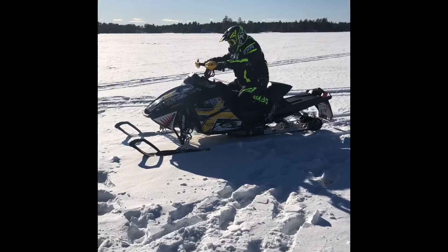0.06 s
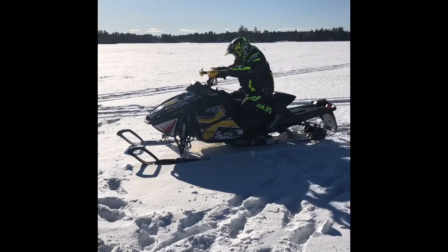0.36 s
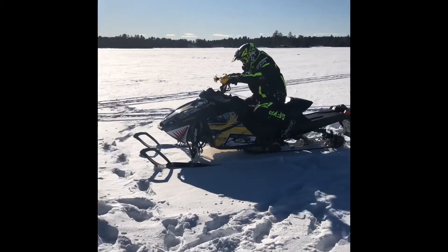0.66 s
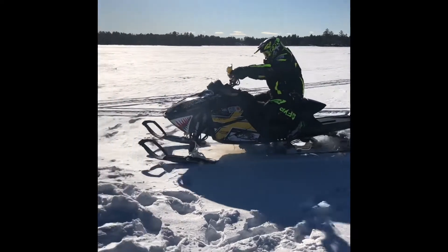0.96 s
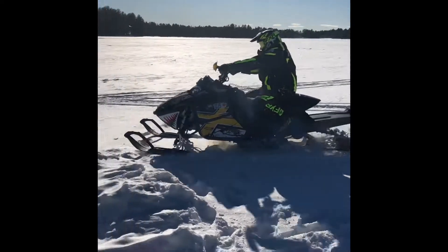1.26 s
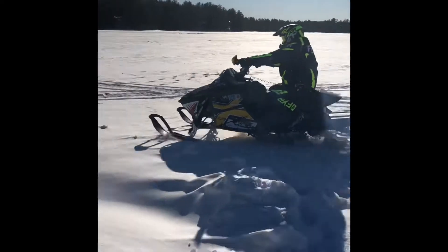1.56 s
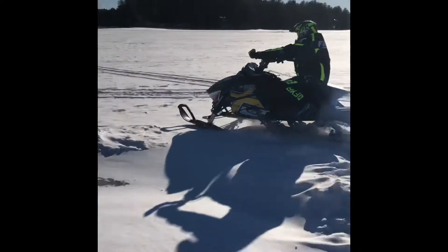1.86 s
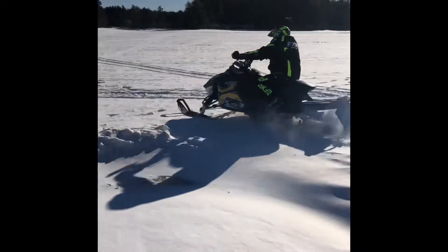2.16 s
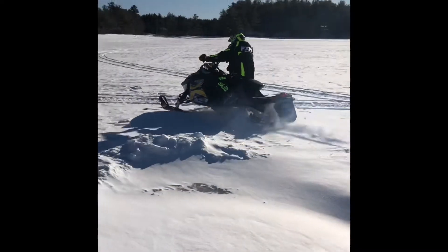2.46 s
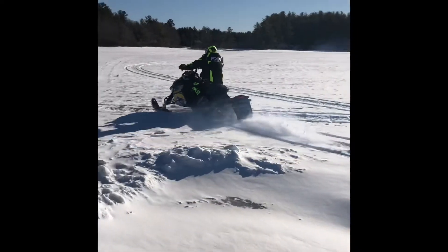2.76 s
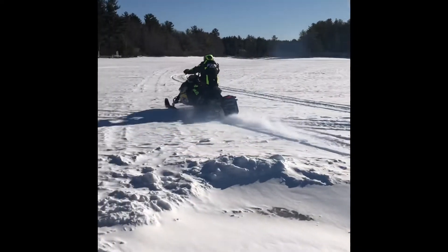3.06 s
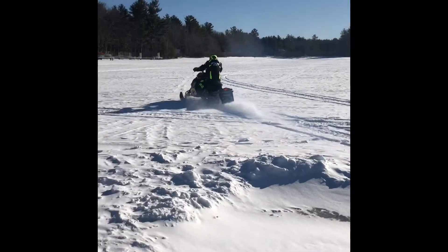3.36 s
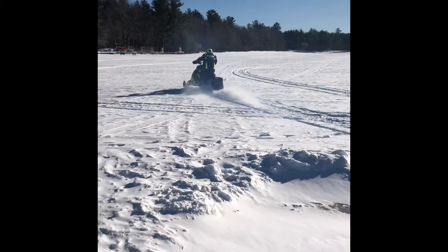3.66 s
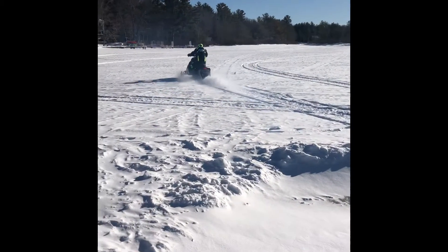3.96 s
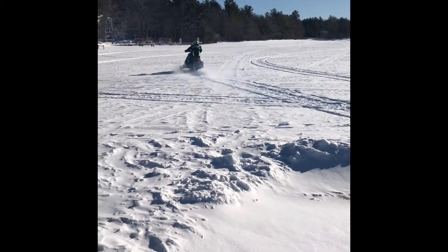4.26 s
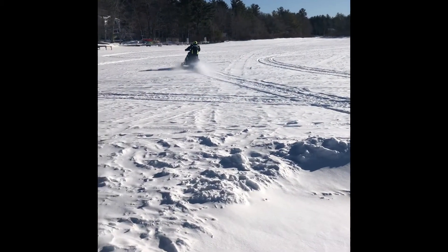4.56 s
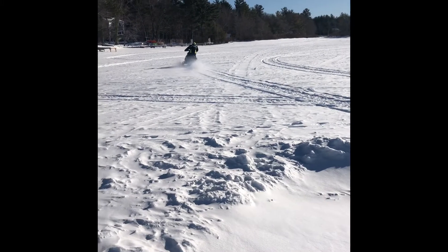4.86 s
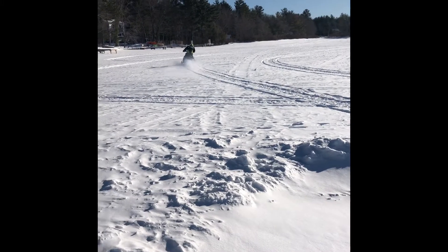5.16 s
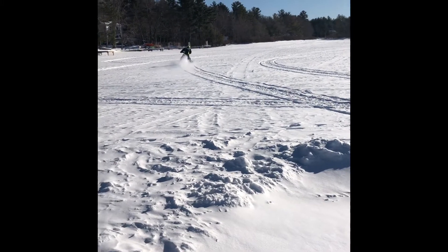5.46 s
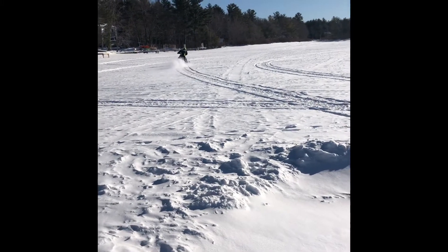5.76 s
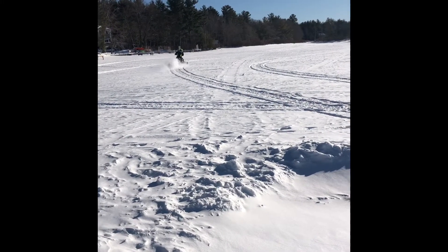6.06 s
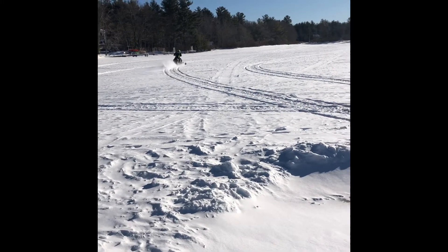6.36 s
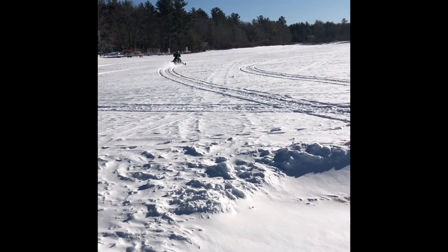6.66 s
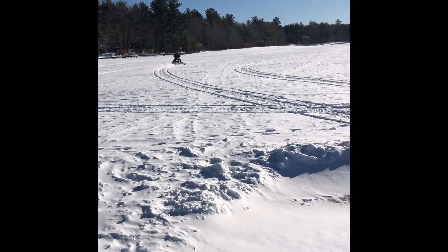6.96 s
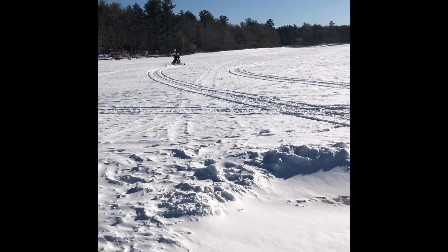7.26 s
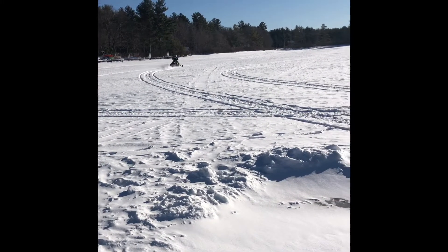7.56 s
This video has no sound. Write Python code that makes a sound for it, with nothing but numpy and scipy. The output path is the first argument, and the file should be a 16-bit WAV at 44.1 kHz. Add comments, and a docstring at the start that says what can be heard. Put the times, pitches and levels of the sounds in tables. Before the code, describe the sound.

A two-stroke snowmobile gives two quick, rattling throttle blips close to the microphone, then pulls away with a raspy drone. Its track rumbles, crunches through the crust and throws hissing snow. The engine climbs in pitch while fading across open snow, drops as it coasts, then rises again faintly far off. Low wind gusts buffet the microphone throughout.

```python
"""A two-stroke twin snowmobile blips its throttle, pulls away over snow, coasts and opens up far off.
Each firing pulses the exhaust pipe, giving a harmonic series on the firing rate, while the pistons
force the engine case into resonance. The drive hisses; the track rumbles, drums, breaks the crust and
throws snow. The sled fades and dulls with distance, and the low end throbs late in the ride.
Low gusts rumble on the microphone."""
import sys
import numpy as np
from scipy import signal
from scipy.fft import rfft, irfft, next_fast_len
from scipy.io import wavfile
from scipy.ndimage import uniform_filter1d, map_coordinates

SR = 44100
rng = np.random.default_rng(int(sys.argv[2]) if len(sys.argv) > 2 else 0)


def wav_out(sig):
    """Save sig, one row per channel (or a flat mono array), as 16-bit PCM at SR to the path in sys.argv[1]."""
    wavfile.write(sys.argv[1], SR, np.round(np.clip(np.atleast_2d(sig).T, -1, 1) * 32767).astype(np.int16))


N = 340011


def amp(db):
    """Amplitude ratio of a level in decibels."""
    return 10 ** (np.asarray(db) / 20)

def unit(x):
    """Normalisation to rms 1."""
    return x / np.sqrt(np.mean(x ** 2) + 1e-20)

def along(points, hz):
    """Interpolation of (f/Hz, value) points on a logarithmic frequency axis."""
    f, values = np.transpose(points)
    return np.interp(np.log(hz + 1), np.log(f), values)

def curves(rows):
    """Linear interpolation in time: one value per sample for each column after t/s."""
    times, *columns = np.transpose(rows)
    return [np.interp(np.arange(N) / SR, times, column) for column in columns]

def wobble(rate):
    """Smooth random modulation with `rate` knots a second."""
    coarse = np.arange(0, N + 32, 32)
    knots = rng.standard_normal(int(N * rate / SR) + 4)
    return np.interp(np.arange(N), coarse, map_coordinates(knots, [coarse * rate / SR]))

def filtered(x, response):
    """Linear filtering: the spectrum of x times a frequency response."""
    size = next_fast_len(N + SR // 4)
    return irfft(rfft(x, size) * response(np.fft.rfftfreq(size, 1 / SR)), size)[:N]

def noise(spectrum):
    """Spectral shaping of white noise, at rms 1."""
    return unit(filtered(rng.standard_normal(N), lambda hz: amp(along(spectrum, hz))))

def bumps(rows):
    """Sum of Gaussian pulses (t/s, half length/s, height)."""
    t = np.arange(N) / SR
    return sum(height * np.exp(-np.minimum(((t - s) / width) ** 2, 20)) for s, width, height in rows)

def swells(rows):
    """Envelope of Gaussian pulses (t/s, half length/s, peak level/dB)."""
    return bumps([(s, width, amp(db)) for s, width, db in rows])

def pulsation(cycles, depth):
    """Periodic amplitude modulation: a gain of rms 1 that swells once a cycle."""
    return unit(np.exp(depth * np.cos(2 * np.pi * cycles)))


# the rider's thumb: t/s, throttle opening/1
THROTTLE = [(0, 0.34), (.1, 0.79), (.2, 0.5), (.42, 0), (.57, 0.26), (.65, 0.77), (.75, 0.8), (.98, 1),
            (1.2, 0.86), (1.4, 0.71), (1.8, 0.69), (2.35, 0.43), (3.3, 0.89), (4.05, 0.76), (4.62, 0.76),
            (4.98, 0.22), (6.15, 0.28), (6.3, 0.45), (7.7, 0.65)]
# range of the sled: t/s, distance/m
DISTANCE = [(0, 2.84), (1.6, 3.01), (2.7, 3.7), (3.5, 7.24), (4.65, 12.2), (5.15, 19), (5.55, 28),
            (6.2, 33.4), (6.62, 43), (7, 36.3), (7.7, 42.6)]

def ride(reference_m=3.15, half_blur_m=18.7):
    """Source state: throttle closure, range in metres and in doublings, blurred share of the sound."""
    shut = 1 - np.clip(curves(THROTTLE)[0], 0, 1)
    metres = np.maximum(curves(DISTANCE)[0], 1)
    blur = metres ** 2 / (metres ** 2 + half_blur_m ** 2)
    return shut, metres, np.log2(metres / reference_m), blur

def level(state, full_db, shut_loss_db, doubling_loss_db, snow_db_per_m):
    """Level/dB: that at full throttle less losses to closure, spreading and absorption over snow."""
    shut, metres, doublings, _ = state
    return full_db - shut_loss_db * shut - doubling_loss_db * doublings - snow_db_per_m * metres


# fundamental, at the firing rate: t/s, level/dB
BOOM = [(0, -13.5), (.73, -14.5), (1.6, -11.5), (2.65, -11.5), (3.45, -19.5), (4.8, -27.5), (4.92, -40.5),
        (6.55, -39.5), (6.8, -44), (7.7, -48.5)]
# missed firings as the throttle shuts: t/s, depth/1
MISFIRES = [(.308, 1), (.352, 0.8), (.363, 0.9), (.415, 0.4), (0.448, 0.75), (.472, 0.6), (.491, 0.8)]
# harmonics 2 and 3: t/s, level/dB re BOOM
DRONE = [(0, -23.5), (1.4, -16), (1.8, -23), (2.05, -54), (2.5, -37), (3.1, -23), (4.5, -32), (7.7, -28)]
GROWL = [(0, -18.5), (.75, -27), (1, -36), (7.7, -32)]
# harmonic 4: t/s, level/dB
HOWL = [(0, -55), (.45, -49), (.72, -22.5), (1.08, -24), (1.3, -41), (1.6, -23.5), (1.85, -17.5),
        (2.25, -45), (2.58, -31.5), (3.35, -31.5), (4.6, -50), (6.1, -67), (6.3, -46.5), (7.7, -49.5)]
# harmonics 5 and 6, before the pipe's gain: t/s, level/dB
BARK = [(0, -24), (.3, -32), (.5, -56), (.57, -36), (.65, -26), (.82, -27.5), (1, -19), (1.4, -30.5),
        (1.8, -34), (2.2, -37), (2.42, -32.5), (2.75, -41.5), (3.1, -34.5), (3.6, -41.5), (4.5, -34.5),
        (5.1, -64), (6.2, -65), (6.6, -55), (7.7, -59)]
# pipe resonances for the bark and for the rasp (harmonics 7 to 26): f/Hz, gain/dB
BARK_PIPE = [(660, -12), (750, -13), (778, 0), (820, 2.5), (900, 4.5), (922, -2), (1020, -11), (1130, -29)]
RASP_PIPE = [(850, -8), (1050, 1), (1200, -11), (1380, -4), (1520, -4), (1850, -18.5), (1970, -15),
             (2110, -4.5), (2250, -6), (2410, -11), (2550, -10), (2900, -24.5), (4500, -59)]

def exhaust(firing_hz, firings, state, surge, dispersion_rad=0.0907, flutter_db=1.5, misfire_s=0.0047):
    """Source and filter: periodic pressure pulses form harmonics that glide through pipe resonances."""
    shut, _, doublings, blur = state
    phase = 2 * np.pi * firings
    boom_db, = curves(BOOM)
    roughness = 0.41 * shut ** 2 + 0.28 * blur
    boom = np.cos(phase) + roughness * (wobble(110) * np.cos(phase) + wobble(110) * np.sin(phase))
    subharmonic = np.cos(phase / 2)  # the two cylinders are not quite alike
    boom += amp(-31.5) * subharmonic
    missed = bumps([(s, misfire_s, depth) for s, depth in MISFIRES])
    boom *= amp(boom_db) * surge * np.clip(1 - missed, 0, 1)

    harmonic_db = {2: boom_db + curves(DRONE)[0], 3: boom_db + curves(GROWL)[0], 4: curves(HOWL)[0]}
    for k in (5, 6):
        harmonic_db[k] = curves(BARK)[0] + along(BARK_PIPE, k * firing_hz)
    rasp_db = level(state, full_db=-20.5, shut_loss_db=30.5, doubling_loss_db=5, snow_db_per_m=0.2)
    dulling_db_per_khz = 8.5 * shut + 2.2 * doublings  # above 1 kHz
    for k in range(7, 27):
        hz = k * firing_hz
        treble_loss_db = dulling_db_per_khz * np.maximum(hz / 1000 - 1, 0)
        harmonic_db[k] = rasp_db + along(RASP_PIPE, hz) - treble_loss_db
    # dispersion smears each pulse: high harmonics leave the pipe later
    overtones = sum(amp(db + flutter_db * wobble(14)) * np.cos(k * phase - dispersion_rad * k * k)
                    for k, db in harmonic_db.items())
    scatter_db = 0.32 + 2.5 * shut ** 2  # firings grow uneven as the throttle shuts
    overtones *= amp(scatter_db * wobble(150)) * (1 + 0.12 * subharmonic)
    return np.sqrt(2) * (boom + overtones)


def strokes(firings, other_piston, scatter_db=1.2):
    """Impulse train: one blow a firing, pistons alternating, each shared between two samples."""
    stroke = np.arange(1, int(firings[-1]))
    at = np.interp(stroke, firings, np.arange(N))
    force = np.where(stroke % 2, 1, other_piston) * amp(scatter_db * rng.standard_normal(len(stroke)))
    sample, late = at.astype(int), at % 1
    blows = np.bincount(sample, force * (1 - late), N + 1) + np.bincount(sample + 1, force * late, N + 1)
    return blows[:N]


# engine case modes: f/Hz, bandwidth/Hz, gain/dB
CASE_MODES = [(1393, 187, -7.5), (1608, 76.6, 3), (1713, 87, -0.5), (2404, 380, -17), (3860, 120, -31)]

def engine_case(force):
    """Modal superposition: damped resonances of alternating sign answer a force, at rms 1."""
    def response(hz):
        return sum((-1) ** k * amp(db) * 1j * hz * width / (mode_hz ** 2 - hz ** 2 + 1j * hz * width)
                   for k, (mode_hz, width, db) in enumerate(CASE_MODES))
    return unit(filtered(force, response))


# case rattle: t/s, level/dB
RATTLE = [(0, -31), (.09, -27), (.15, -21), (.29, -25), (.42, -33), (.58, -28), (.73, -22), (1.05, -31),
          (1.53, -23), (2.3, -26.5), (2.72, -23), (2.98, -27), (4.6, -33), (4.83, -31), (5.1, -36),
          (5.75, -42), (6.4, -50), (7.7, -56)]
# looseness of the case: t/s, noisy share of the power/1
LOOSENESS = [(.7, .55), (1.3, .15), (2.3, .18), (2.6, .42), (3, .12), (3.7, .5), (4.9, .65), (7.7, .55)]

def rattle(firings):
    """Forced vibration: the pistons rock the case once a shaft turn, as knocks and loose chatter."""
    knocks = engine_case(strokes(firings, other_piston=-0.7))
    shaft_turns = (firings - 1) / 2
    chatter = engine_case(rng.standard_normal(N) * pulsation(shaft_turns, depth=0.059))
    loose = np.clip(curves(LOOSENESS)[0], 0, 1)
    gain = amp(curves(RATTLE)[0] + wobble(16))
    return gain * (np.sqrt(1 - loose) * knocks + np.sqrt(loose) * chatter)


# spectrum of the rushing gas: f/Hz, relative density/dB
GAS_SPECTRUM = [(120, -47), (280, -3.5), (400, -5), (520, 2.5), (850, 3), (1150, -2.5), (1900, -5),
                (2600, -17), (3500, -31), (8000, -60)]

def gas_rush(firings, state):
    """Flow noise: rushing gas, amplitude-modulated at the firing rate."""
    db = level(state, full_db=-27.5, shut_loss_db=0.5, doubling_loss_db=4.5, snow_db_per_m=0.33)
    return amp(db) * noise(GAS_SPECTRUM) * pulsation(firings, depth=0.25)


# spectra of the drive, close by and far off: f/Hz, relative density/dB
NEAR_HISS = [(500, -2.5), (1500, -4), (1950, 3.5), (2500, 6), (3200, -0.5), (3950, 1), (4600, -5.5),
             (6000, -5), (7000, -6.5), (8100, -22), (9200, -16.5), (16000, -49)]
FAR_HISS = [(500, -11), (1000, 13), (1400, 4.5), (2000, 2.5), (2600, 2.5), (3300, 2), (3900, 2.5),
            (4700, -4), (6500, -5), (8000, -22), (9200, -24), (16000, -58)]

def drive_hiss(firings, state, ring_t60_s=0.043):
    """Impulse response: each blow rings small metal parts; far off the buzz blurs into plain hiss."""
    *_, blur = state
    t = np.arange(SR // 50) / SR
    jangle = rng.standard_normal(len(t)) * amp(-60 * t / ring_t60_s)
    blows = signal.fftconvolve(strokes(firings, other_piston=0.6), jangle)[:N]
    buzz = unit(filtered(blows, lambda hz: amp(along(NEAR_HISS, hz))))
    near = 0.76 * noise(NEAR_HISS) * pulsation(firings, depth=0.15) + 0.65 * buzz
    far = amp(1.0) * noise(FAR_HISS)
    db = level(state, full_db=-29, shut_loss_db=9.5, doubling_loss_db=3.3, snow_db_per_m=0.21)
    return amp(db) * (np.sqrt(1 - blur) * near + np.sqrt(blur) * far)


# spectrum of thrown snow: f/Hz, relative density/dB
SPRAY_SPECTRUM = [(4000, -19), (7500, 10), (9000, 4.5), (10500, 3.5), (12500, 0.5), (14500, 3.5),
                  (16000, 0.5)]
# plume flung up by the track: t/s, half length/s, peak level/dB
PLUMES = [(3.49, 0.095, -46)]

def snow_spray(state):
    """Granular noise: snow thrown by the track, its grain smoothing with distance."""
    *_, blur = state
    grains = unit(noise(SPRAY_SPECTRUM) * amp(1.2 * (1.5 - blur) * wobble(1200)))
    db = level(state, full_db=-38, shut_loss_db=9.5, doubling_loss_db=6, snow_db_per_m=0.1)
    return (amp(db) + swells(PLUMES)) * grains


# gusts: t/s, half length/s, peak level/dB
GUSTS = [(.3, 0.1, -30), (.9, .3, -36), (1.82, 0.075, -23.5), (2.2, 0.097, -30), (2.75, 0.076, -32),
         (3.8, 0.33, -48), (4.6, 0.08, -42), (5.13, 0.086, -31.5), (5.5, 0.17, -41), (6.19, 0.032, -38),
         (6.74, .13, -37.5), (7.64, 0.082, -41)]
# spectrum of the wind: f/Hz, relative density/dB
WIND_SPECTRUM = [(15, -50), (30, -19), (48, -9), (70, -0.5), (95, -1.5), (140, -3.5), (220, -13.5),
                 (500, -68)]

def wind_buffet(breeze_db=-43, drift_db=2.5):
    """Turbulent pressure on the microphone: a lumpy, drifting breeze with gusts on top."""
    strength = amp(breeze_db + drift_db * wobble(4.4)) + swells(GUSTS)
    return strength * unit(noise(WIND_SPECTRUM) * amp(0.82 * wobble(14)))


# rumble of track and snow: t/s, level/dB
TRACK_RUMBLE = [(.12, -39), (.25, -28), (.6, -44), (.8, -36), (1.85, -36), (2.15, -30.5), (2.78, -28),
                (2.86, -47), (4.2, -46), (4.5, -53), (5.15, -47), (6.05, -58.5), (6.2, -48.5), (6.75, -46),
                (7.2, -53.5), (7.7, -51)]
# its spectrum: f/Hz, relative density/dB
TRACK_RUMBLE_SPECTRUM = [(60, -53), (120, -13), (180, 6), (240, 7.5), (340, -3.5), (440, -3), (700, -37.5)]

def track_rumble():
    """Rolling noise: a rough low rumble of track and snow, about 150-450 Hz."""
    return amp(curves(TRACK_RUMBLE)[0]) * unit(noise(TRACK_RUMBLE_SPECTRUM) * amp(0.79 * wobble(23)))


# thin sizzle as the track passes close: t/s, level/dB
SIZZLE = [(0, -68), (1.3, -48), (2.4, -47.5), (2.7, -52), (3.3, -66), (5, -88)]
# its spectrum: f/Hz, relative density/dB
SIZZLE_BAND = [(6500, -56), (7700, -9), (8050, -5), (8400, -10), (9800, -40)]

def gear_sizzle():
    """Narrow-band noise: the running gear gives a grainy ring near 8 kHz."""
    return amp(curves(SIZZLE)[0]) * unit(noise(SIZZLE_BAND) * amp(1.8 * wobble(200)))


# the track biting into the crust: t/s, peak level/dB
CRUNCHES = [(.655, -32.5), (1.215, -34), (1.535, -29), (1.635, -37)]
# spectrum of breaking crust: f/Hz, relative density/dB
CRUST_SPECTRUM = [(1500, -17), (3000, 2), (5000, 0.5), (8000, -1.5), (12000, -13), (16000, -4)]

def crust_crunches(half_length_s=0.021):
    """Brittle fracture: the snow crust breaks in short, gritty bursts of noise."""
    envelope = swells([(s, half_length_s, db) for s, db in CRUNCHES])
    return envelope * unit(noise(CRUST_SPECTRUM) * amp(3 * wobble(780)))


# lugs striking the snow: t/s, f/Hz, level/dB
LUGS = [(2.9, 117, -52), (3.3, 134, -39), (3.95, 151.8, -33.5), (4.6, 162.3, -45.5), (5.1, 147.9, -35),
        (5.7, 131.4, -49), (6.2, 125.5, -43), (6.6, 128, -78)]

def track_drum():
    """Beating: the lugs drum a tone at their own rate, which interferes with the exhaust note."""
    lug_hz, db = curves(LUGS)
    phase = 2 * np.pi * np.cumsum(lug_hz) / SR
    return np.sqrt(2) * amp(db + 0.47 * wobble(7.4)) * np.sin(phase)


# runs of low throbs: start/s, end/s, period/s, first lift before the sag/dB
THROBS = [(4.92, 5.25, 0.14, 7), (5.315, 6.14, .11, 8.5), (6.673, 6.93, 0.107, 5.5),
          (7.496, 7.67, 0.099, 9)]

def throbbing(half_length_s=0.017, decay_per_throb=0.94):
    """Amplitude modulation: a gain that lifts on each throb of a dying run and sags between them."""
    lift_db = bumps([(s, half_length_s, db * decay_per_throb ** k)
                     for first, end, period, db in THROBS
                     for k, s in enumerate(np.arange(first, end, period))])
    sag_db = 1.32 * uniform_filter1d(lift_db, size=SR // 5)
    return amp(lift_db - sag_db)


# firing rate through two blips, the pull-away, coasting and opening up: t/s, f/Hz
FIRING_RATE = [(0, 135.2), (.06, 141.5), (.12, 152.7), (.18, 156.2), (.3, 140.5), (.48, 126.6), (.54, 130),
               (.72, 163.8), (.78, 166.2), (.84, 158), (.96, 149.8), (1.03, 151), (1.28, 148.5),
               (1.41, 150.3), (1.54, 150.9), (1.68, 153.9), (1.95, 152.5), (2.2, 152.7), (2.42, 155.6),
               (2.71, 167.3), (3.1, 177.3), (3.62, 189.2), (3.75, 187.5), (3.88, 189.5), (4.27, 183.5),
               (4.66, 180.4), (4.92, 165.7), (5.12, 150.3), (6.15, 139.8), (6.48, 153.4), (6.61, 156),
               (6.74, 162.9), (7.05, 171.2), (7.7, 175.4)]

def scene():
    """Superposition: the engine's sounds share one firing phase and add to track, snow and wind."""
    firing_hz, = curves(FIRING_RATE)
    firings = np.cumsum(firing_hz * (1 + 0.0015 * wobble(70))) / SR
    state, surge = ride(), throbbing()
    engine = exhaust(firing_hz, firings, state, surge) + rattle(firings) + gas_rush(firings, state)
    hiss = drive_hiss(firings, state) + snow_spray(state)
    *_, blur = state
    grit = unit(amp((1 - blur / 2) * (0.74 * wobble(900) + 0.69 * wobble(40))))  # the hiss flickers
    mix = engine + grit * hiss + gear_sizzle() + crust_crunches()
    mix += surge * (track_drum() + wind_buffet() + track_rumble())
    return mix[None]

def record(dry, low_cut_hz=28, top_hz=15750):
    """Band limiting: the phone cuts the deepest rumble and passes nothing above its upper limit."""
    def response(hz):
        high_pass = 1 - 1 / (1 + (hz / low_cut_hz) ** 6)
        return high_pass * (hz < top_hz)
    return filtered(dry[0], response)[None]


dry = scene()
out = record(dry)
wav_out(out)
```